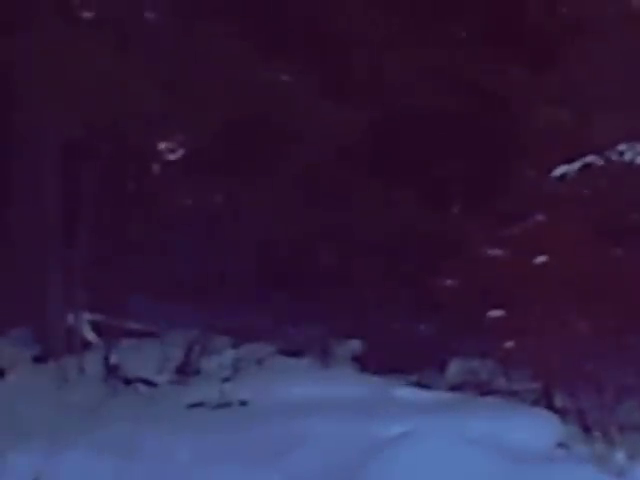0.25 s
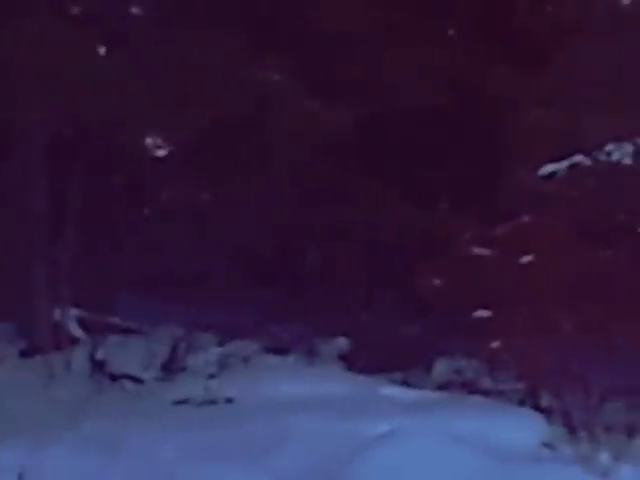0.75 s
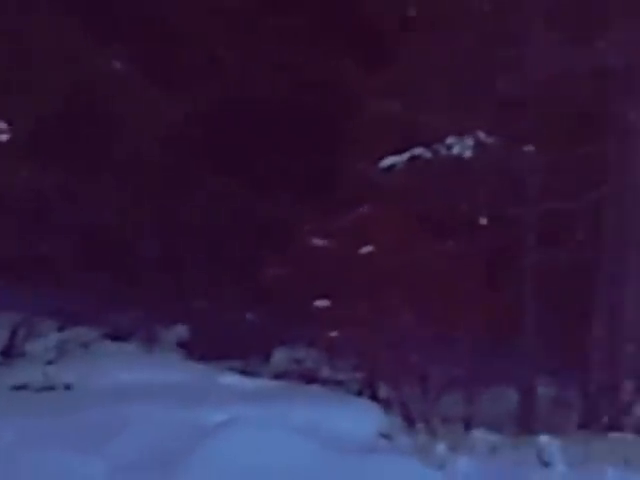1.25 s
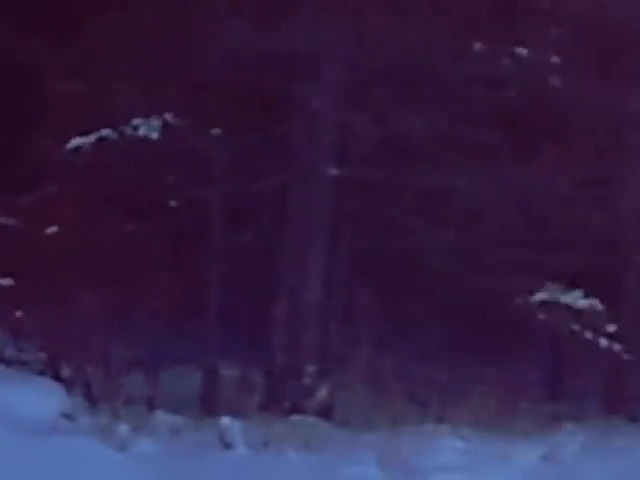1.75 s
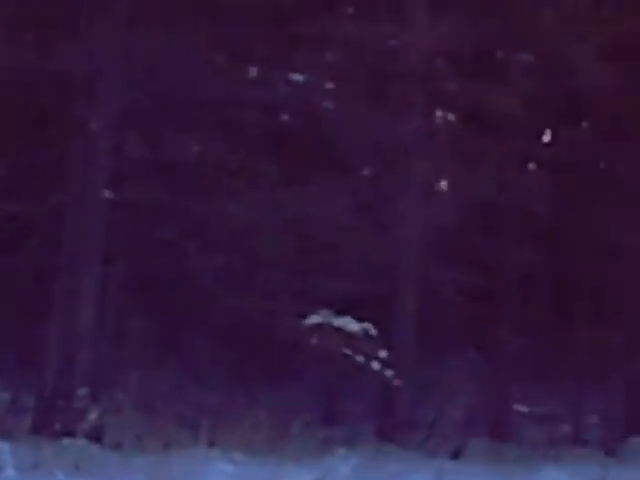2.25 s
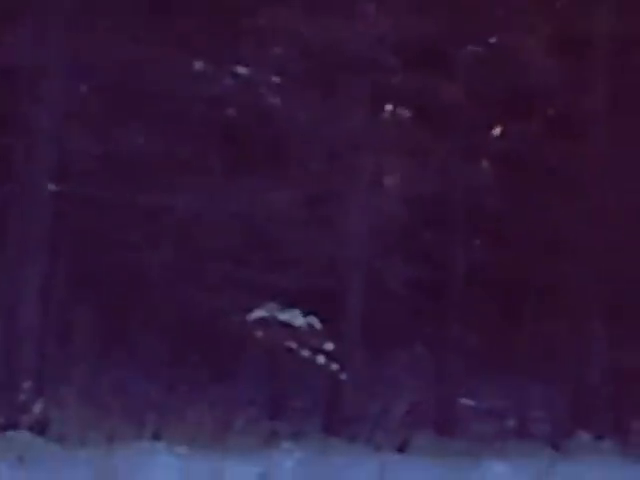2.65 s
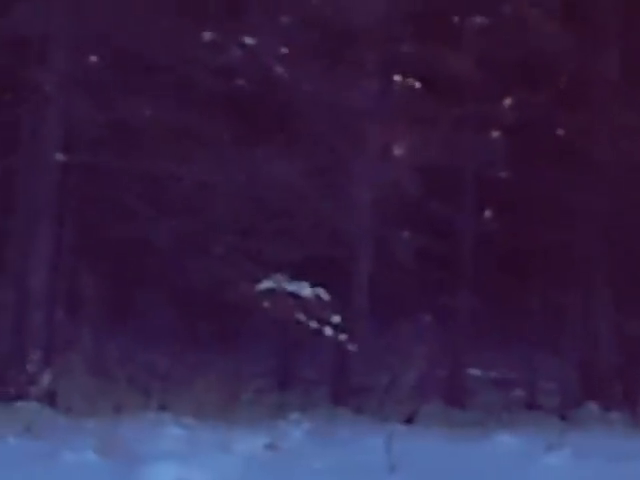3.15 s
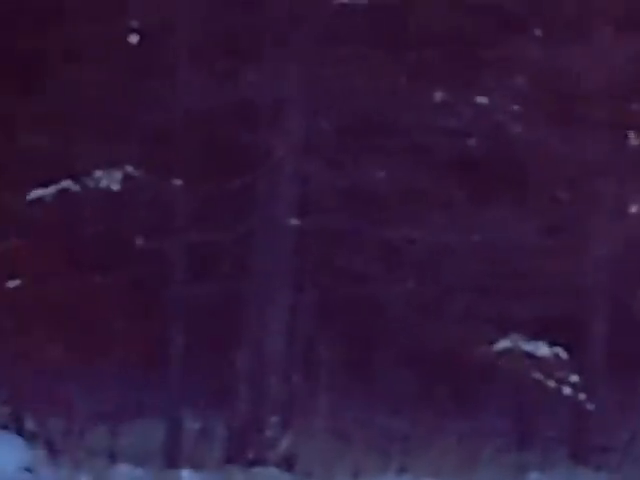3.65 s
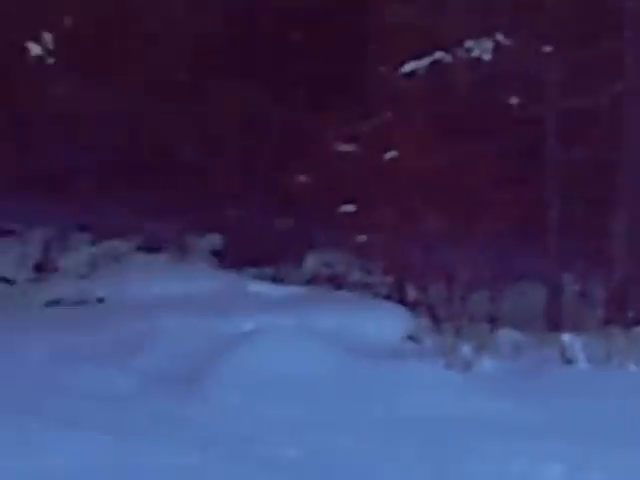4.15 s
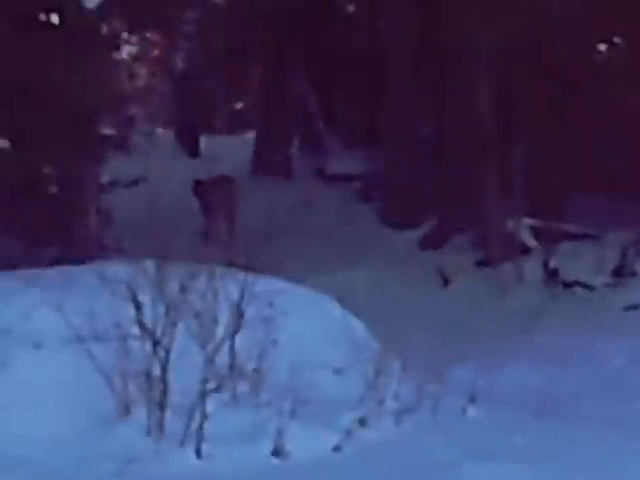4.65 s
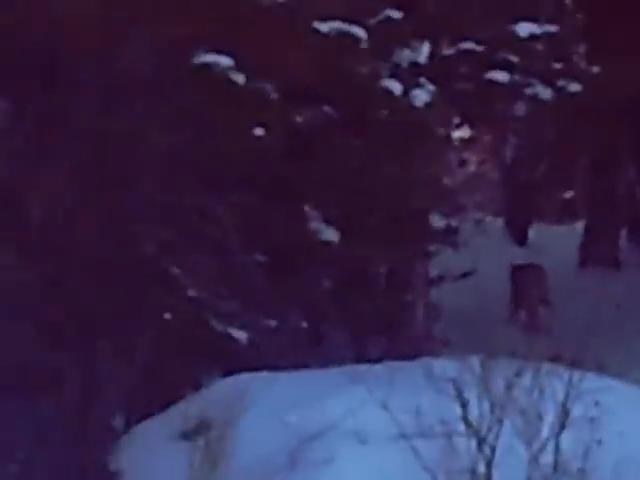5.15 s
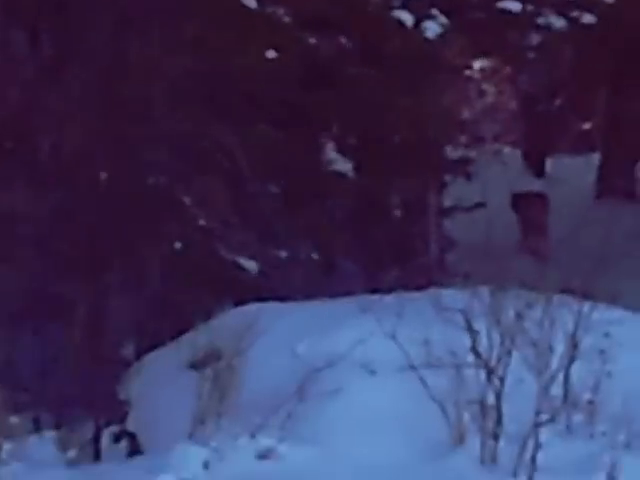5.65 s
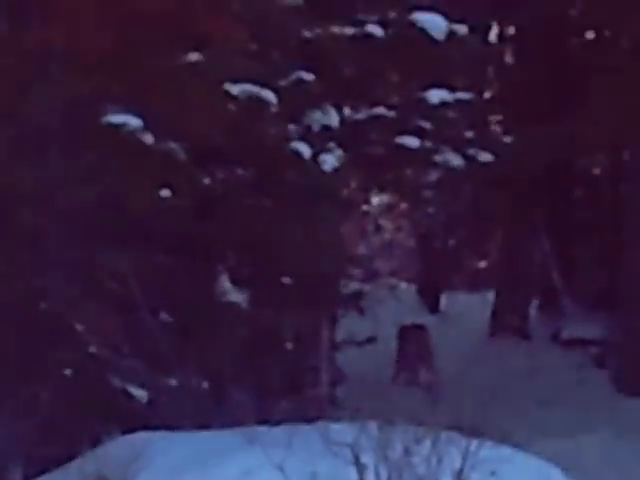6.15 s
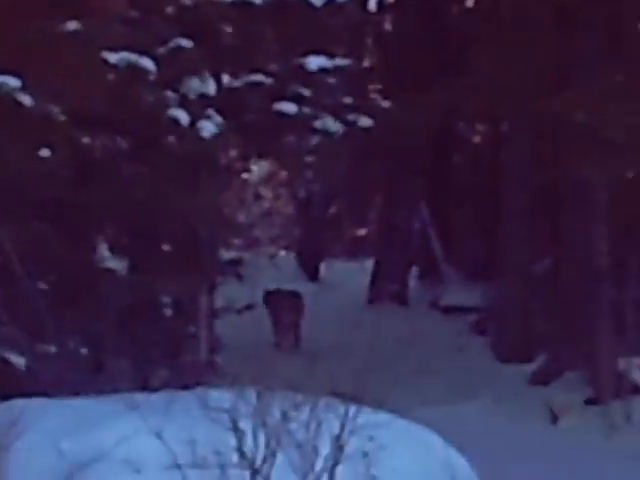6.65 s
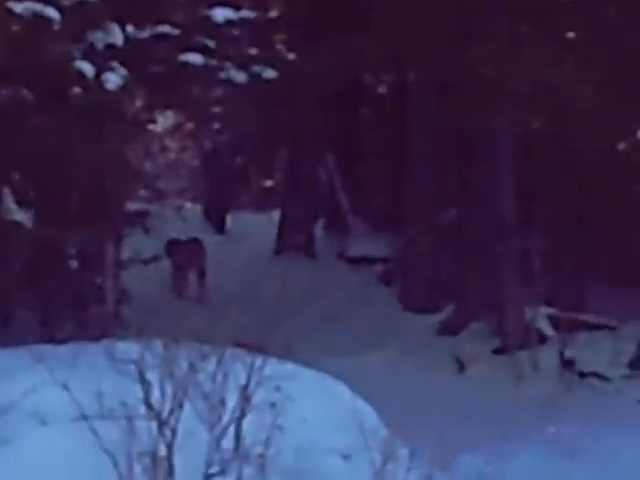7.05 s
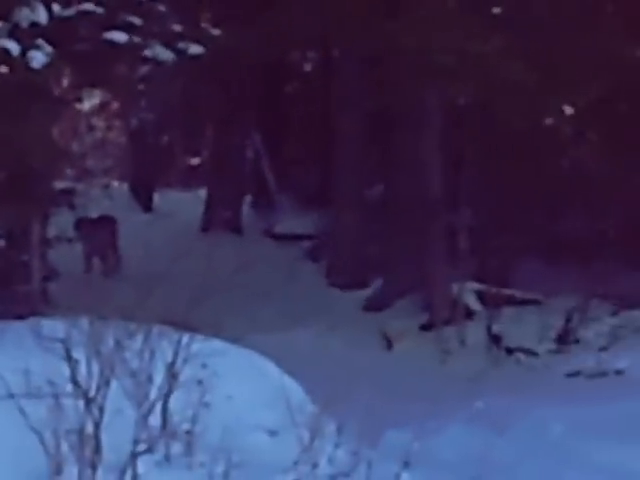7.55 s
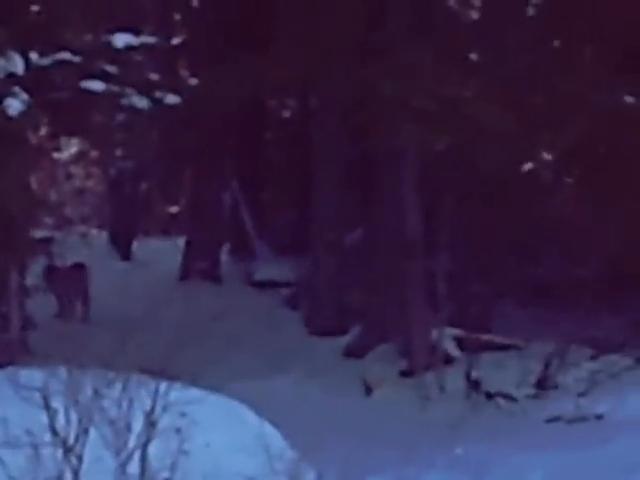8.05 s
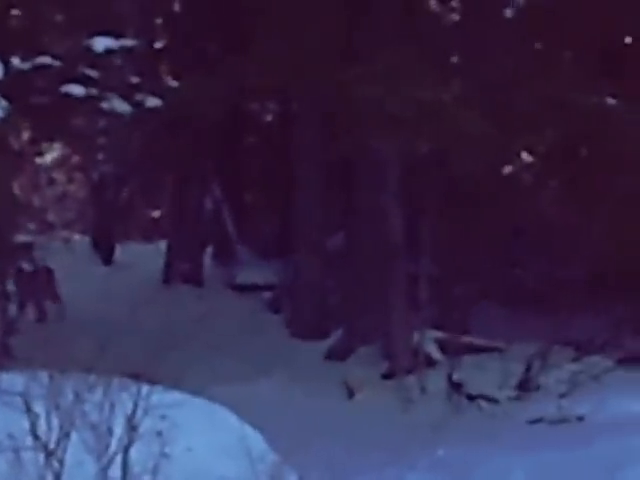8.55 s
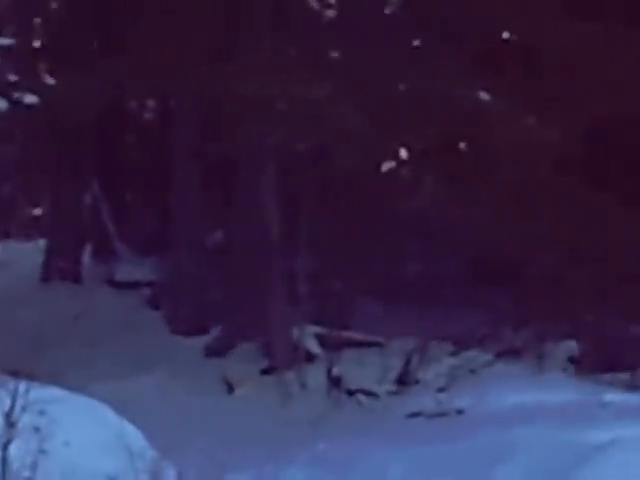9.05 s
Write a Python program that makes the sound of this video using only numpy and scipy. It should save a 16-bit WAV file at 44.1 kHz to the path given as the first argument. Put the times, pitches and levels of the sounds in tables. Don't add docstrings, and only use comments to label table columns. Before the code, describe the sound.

A snowmobile idles for a little over nine seconds close to a small camera in a snowy forest clearing. Its exhaust gives a deep, steady hum near 58 pulses a second, broken by irregular thumps whenever a cylinder burns. Dry piston ticks and chatter, a hollow metallic hood hum and low wind buffeting accompany it from the start. From about 2 seconds a faint, thin generator whine appears, fading and returning. Between 3.3 and 4.5 seconds the camera turns: wind puffs and pops strike the microphone, ticks drop sharply around 4, and the hood's colour changes. More small pops come around 5.1 to 5.5 and 6.2 to 6.4. The exhaust is slightly softer near 6, then rises again as ticking grows clearer toward the end. Grainy hiss pulses with the rumble throughout; the engine never revs or stops.

```python
import sys
import numpy as np
from scipy import signal
from scipy.fft import rfft, irfft, next_fast_len
from scipy.io import wavfile
from scipy.ndimage import uniform_filter1d, map_coordinates

SR = 44100
rng = np.random.default_rng(int(sys.argv[2]) if len(sys.argv) > 2 else 0)


def wav_out(sig):
    wavfile.write(sys.argv[1], SR, np.round(np.clip(np.atleast_2d(sig).T, -1, 1) * 32767).astype(np.int16))


def nominal_scale(level):
    x = np.asarray(level, float) / 20
    return 10 ** x


N = 411005

# (t/s, share/0-1)
FACING = [
    (0, 0),
    (3.3, 0.06),
    (4.2, 0.56),
    (6, 0.98),
    (9.32, 0.96),
]
# (t/s, level/dB)
NEARNESS = [(0, -28), (3.5, -29), (4.1, -28.5), (4.54, -29.5), (5.03, -30), (6.05, -31), (6.6, -30),
            (7.5, -29), (8.57, -28), (9.32, -27.5)]
# (t/s, piston tick level/dB)
SIGHT = [(0, -53.5), (1.17, -56.5), (1.61, -52), (2.05, -51.5), (2.4, -54.5), (3.19, -59), (3.88, -54),
         (4, -71), (4.91, -62.5), (5.61, -60), (6.15, -56.5), (6.41, -60.5), (7.03, -55.5), (7.66, -57),
         (8.93, -53), (9.32, -52)]


def unit(x):
    return x / np.sqrt(np.mean(x ** 2) + 1e-20)


def curve(rows):
    s, values = np.transpose(rows)
    return np.interp(np.arange(N) / SR, s, values)


def along(points, hz):
    f, db = np.transpose(points)
    return nominal_scale(np.interp(np.log(hz + 1), np.log(f + 1), db))


def filtered(x, response):
    m = next_fast_len(N + SR // 2)
    return irfft(rfft(x, m) * response(np.fft.rfftfreq(m, 1 / SR)), m)[:N]


def modes(table, sign=-1):
    def response(f):
        total = 0
        for k, (center, width, db) in enumerate(table):
            damping = 1j * f * width
            total = total + sign ** k * nominal_scale(db) * damping / (center ** 2 - f ** 2 + damping)
        return total
    return response


def noise(spectrum):
    return unit(filtered(rng.standard_normal(N), lambda hz: along(spectrum, hz)))


def wobble(rate):
    knots = rng.standard_normal(int(N * rate / SR) + 4)
    return map_coordinates(knots, [np.arange(N) * rate / SR])


def impulses(times, sizes):
    at = np.round(np.asarray(times) * SR).astype(int)
    inside = (at >= 0) & (at < N)
    return np.bincount(at[inside], sizes[inside], N)


def slot_times(slot, numbers):
    return np.interp(numbers, slot, np.arange(N) / SR, left=-1, right=-1)


def both_sides(x, near, far, direct, sign=-1):
    facing = np.clip(curve(FACING), 0, 1)
    from_near = filtered(x, lambda f: direct + modes(near, sign)(f))
    from_far = filtered(x, lambda f: direct + modes(far, sign)(f))
    return (1 - facing) * from_near + facing * from_far


def traps(f):
    # (f/Hz, depth width/Hz, width/Hz)
    hollows = [(2040, 60, 170), (3200, 130, 290)]
    gain = 1
    for center, deep, wide in hollows:
        stiff = center ** 2 - f ** 2
        gain = gain * (stiff + 1j * f * deep) / (stiff + 1j * f * wide)
    return gain


def wind():
    # (f/Hz, level/dB per Hz)
    buffet = [(5, -7.5), (15, 4), (28, 3), (45, -9.5), (120, -28.5), (300, -56.5)]
    # (f/Hz, level/dB per Hz)
    flutter = [(40, -16), (90, 0.5), (160, 0), (300, -6.5), (600, -20.5), (1200, -43)]
    # (t/s, level/dB, length/s)
    puffs = [(2.116, -48.5, 0.03), (2.734, -47, 0.046), (3.295, -42, 0.018), (3.341, -53, 0.049),
             (4.543, -43, 0.01), (3.567, -42, 0.0077), (3.677, -44, 0.049), (4.3, -50.5, 0.084),
             (5.09, -48, 0.012), (5.155, -51, 0.02), (5.195, -50, 0.013), (5.227, -50.5, 0.027),
             (5.467, -52.5, 0.078), (5.583, -51.5, 0.058), (6.21, -49.5, 0.029), (6.334, -47.5, 0.045),
             (7.78, -55, 0.034)]
    # (t/s, peak level/dB, length/s, sign)
    pops = [(3.298, -24, 0.00083, -1), (3.308, -37, 0.0008, -1), (3.338, -36, 0.00076, 1),
            (3.356, -30, 0.0012, -1), (3.576, -26, 0.0017, -1), (3.579, -29, 0.0012, 1),
            (3.661, -35, 0.0014, -1), (3.695, -26, 0.0014, 1), (3.7, -24, 0.00066, -1),
            (4.544, -31, 0.0006, 1), (4.5455, -27, 0.00035, -1), (5.093, -20, 0.0006, 1),
            (5.147, -23, 0.001, -1), (5.155, -30, 0.0012, -1), (5.194, -29, 0.0004, 1),
            (5.221, -30, 0.0007, 1), (5.467, -21, 0.0004, 1), (6.239, -25, 0.00082, 1),
            (6.263, -25, 0.0012, -1), (6.318, -29, 0.0008, -1), (6.321, -33.5, 0.00079, 1),
            (6.335, -37, 0.0012, -1), (6.355, -22, 0.0011, 1)]
    t = np.arange(N) / SR
    gusts = nominal_scale(-52.5)
    push = 0
    for s, db, length in puffs:
        gusts = gusts + nominal_scale(db) * np.exp(-((t - s) / length) ** 2)
        push = push + nominal_scale(db + 7) * np.exp(-((t - s) / (2.2 * length)) ** 2)
    air = (nominal_scale(-46.5 + 6.5 * wobble(8.5)) + push) * noise(buffet)
    air += gusts * nominal_scale(2.0 * wobble(40)) * noise(flutter)
    for s, db, length, sign in pops:
        u = (t - s) / max(length, .0003)
        air += np.sign(sign) * nominal_scale(db) * np.exp(.5 - np.sqrt(u * u + 0.35))
    return air


def generator_whine(slot, burn):
    # (t/s, level/dB)
    whine_db = [(0, -82), (1.7, -82), (2.2, -57), (3.1, -53.5), (3.7, -68), (4.5, -51), (5.6, -60.5),
                (6.3, -56.5), (7, -58), (7.9, -51), (9.32, -58)]
    beat = 1 + .5 * np.cos(np.pi * slot - 1)
    poles = 2 * np.pi * 30.03 * slot
    strength = beat * (1 + 0.23 * burn) ** 3 * nominal_scale(2.5 * wobble(30))
    whine = strength * np.cos(poles + 1.05 * wobble(60))
    return nominal_scale(curve(whine_db) - 10.5) * unit(whine)


def hood_hum(burn):
    # (f/Hz, level/dB per Hz)
    engine_noise = [(60, -26), (130, -3.5), (200, -20.5), (260, -21), (450, -24.5), (1000, -21),
                    (1800, -26.5), (1950, -51), (3500, -37.5), (4500, -38), (8000, -43)]
    # (f/Hz, width/Hz, level/dB)
    near_hood = [(514, 49, 2), (710.5, 30, 3.5), (807, 22, -7.5), (1043, 32, 2), (1490, 150, -26.5)]
    far_hood = [(516, 43, -2.5), (685.5, 8.2, 2.5), (809, 10, -1.5), (1255, 27, 2.5), (4240, 220, 1.5),
                (4614, 70, 9), (4780, 81, -8), (5200, 470, -9.5)]
    shaking = noise(engine_noise) * (1 + 0.23 * burn) * nominal_scale(0.22 * wobble(40))
    hum = filtered(both_sides(shaking, near_hood, far_hood, 0.42), traps)
    hum /= np.std(filtered(hum, lambda f: (f > 400) & (f < 1600)))
    hidden_db = -56.5
    sight_db = np.maximum(curve(SIGHT), hidden_db) - hidden_db
    return nominal_scale(curve(NEARNESS) - 26 + 0.16 * sight_db) * hum


def piston_ticks(slot, burn):
    # (f/Hz, width/Hz, level/dB)
    near_piston = [(2337, 200, 3), (3030, 190, 1.5), (2700, 110, -16.5), (3980, 270, -4.5),
                   (4400, 260, -3.5), (5200, 110, -3.5), (5630, 180, -6), (6000, 180, -2), (6440, 230, -5)]
    far_piston = [(2207, 250, 2.5), (2570, 220, -8.5), (2943, 100, 2.5), (3680, 200, -8), (4170, 130, -5),
                  (4700, 85, -4)]
    turn = np.arange(int(slot[-1] / 2) + 1)
    scatter = nominal_scale(rng.normal(0, 1.2, (len(turn), 2)))
    late = rng.normal(0, .00022, (len(turn), 2))
    strong = impulses(slot_times(slot, 2 * turn + 1.23) + late[:, 0], scatter[:, 0])
    weak = impulses(slot_times(slot, 2 * turn + .12) + late[:, 1], scatter[:, 1])
    slaps = strong + weak * nominal_scale(-7.5 + 6.5 * curve(FACING) ** 2)

    back = slot_times(slot, np.arange(2 * len(turn)) + .17) + .0098
    back = back + rng.normal(0, .0009, len(back))
    slaps = slaps + impulses(back, nominal_scale(-12 + rng.normal(0, 2.7, len(back))))
    slaps = slaps * (1 + .15 * np.roll(burn, SR // 80))

    t = np.arange(SR // 40) / SR
    chatter = nominal_scale(-60 * t / .022) * np.minimum(t / .002, 1)
    rattle = np.convolve(slaps, chatter)[:N] * rng.standard_normal(N)
    knocks = slaps + .06 * rattle

    def wall(f):
        return modes([(2700, 1500, 0)])(f) + 0.79 * f ** 8 / (f ** 8 + 2000.0 ** 8)

    def oil_film(f):
        return traps(f) * modes([(2650, 1300, 0)])(f) ** 2 + 0.6 * traps(f) * (f > 3300)

    knocks = filtered(filtered(knocks, wall), oil_film)
    ticks = unit(both_sides(knocks, near_piston, far_piston, 0, sign=0.97))
    return nominal_scale(curve(SIGHT) - 1.5) * ticks


def burn_blows(slot):
    count = int(slot[-1]) + 1
    luck, gauss = rng.random(count), rng.standard_normal((count, 2))
    charge = .5
    burn_db = np.full(count, -120.)
    for n in range(count):
        charge += .35 + .12 * gauss[n, 0]
        if charge > 1:
            burn_db[n] = 1 - (charge - 1) - 1.2 * gauss[n, 1]
            charge = 0
        elif luck[n] < .2:
            burn_db[n] = -0.5 + 1.5 * gauss[n, 1]
    return impulses(slot_times(slot, np.arange(count)) - .025, nominal_scale(burn_db))


def pumping_tones(slot):
    # (order/cycles per turn, level/dB against the exhaust, lag/rad)
    pumping = [(1, -23, 1.4), (2, -2.6, .33), (4, -21, -.42)]
    # (near side level/dB, far side level/dB, wander/dB, lead/rad)
    overtones = [(-26.5, -34.5, 2, 2.5), (-22, -30.5, 1.8, 2.5), (-26.5, -24.5, 0.85, -0.5)]
    # (harmonic/number, near side level/dB, far side level/dB)
    high_tones = [(6, -37.5, -52.5), (8, -42, -46.5), (10, -42, -40)]
    facing = curve(FACING)
    tones = sum(nominal_scale(db) * np.cos(np.pi * order * slot - lag) for order, db, lag in pumping)
    for k, (near_db, far_db, wander_db, lead) in enumerate(overtones):
        db = near_db + (far_db - near_db) * facing + wander_db * wobble(3)
        db = db + .7 + .8 * wobble(12)
        drift = lead + .15 * wobble(6)
        tones = tones + nominal_scale(db) * np.cos(2 * np.pi * (k + 3) * slot + drift)
    for order, near_db, far_db in high_tones:
        db = near_db + (far_db - near_db) * facing
        tones = tones + nominal_scale(db) * np.cos(2 * np.pi * round(order) * slot)
    return np.sqrt(2) * tones


def muffler_thumps(blows):
    # (f/Hz, width/Hz, level/dB)
    chambers = [(40.3, 19.2, 21.5), (72.84, 41.8, 29.5), (84.9, 44.9, 27.5)]
    # (f/Hz, width/Hz, level/dB)
    sheet = [(216.7, 22, 7.5), (304.8, 17, 3), (368.3, 13.5, 2), (520.7, 10, -7.5), (685.7, 16, 0)]

    def chamber_sound(f):
        echo = 1 + 0.67 * np.exp(-2j * np.pi * f * 0.02975)
        return modes(chambers)(f) * echo / (1 + (f / 150) ** 4)

    def shell_sound(f):
        ring = modes(sheet)(f)
        return ring * np.abs(ring) ** .5

    shell = filtered(blows, shell_sound) * nominal_scale(1.5 - 6.1 * curve(FACING))
    return nominal_scale(30.5) * (filtered(blows, chamber_sound) + shell)


def exhaust(slot, blows):
    return nominal_scale(curve(NEARNESS)) * (pumping_tones(slot) + muffler_thumps(blows))


def scene():
    # (t/s, rate/Hz)
    speed = [(0.0, 59.65), (0.55, 57.81), (1.1, 58.68), (1.64, 57.39), (2.19, 58.24), (2.74, 58.25),
             (3.29, 58.0), (3.84, 57.83), (4.39, 58.49), (4.93, 58.64), (5.48, 57.75), (6.03, 57.81),
             (6.58, 58.43), (7.13, 57.74), (7.68, 58.86), (8.22, 58.16), (8.77, 58.2), (9.32, 56.97)]
    slot = -.255 + np.cumsum(curve(speed)) / SR
    blows = burn_blows(slot)
    burn = unit(np.convolve(blows, np.hanning(SR // 30))[:N])
    engine = generator_whine(slot, burn) + hood_hum(burn) + piston_ticks(slot, burn)
    return (wind() + engine + exhaust(slot, blows))[None]


def band_limit(x):
    return signal.sosfilt(signal.butter(12, 9730, fs=SR, output="sos"), x)


def record(dry):
    # (f/Hz, level/dB)
    converter = [(300, 1), (2000, -2), (5000, -4), (7000, -7), (8000, -14.5), (9000, -21.5), (9700, -31.5),
                 (10500, -74.5)]
    pressure = uniform_filter1d(np.abs(dry[0]), size=SR // 250)
    step = nominal_scale(-64.5) * (1 + pressure / 0.0095)
    hissy = dry[0] + step * rng.standard_normal(N)
    mix = filtered(hissy, lambda hz: along(converter, hz))[None]
    return band_limit(mix)


dry = scene()
out = record(dry)
wav_out(out)
```